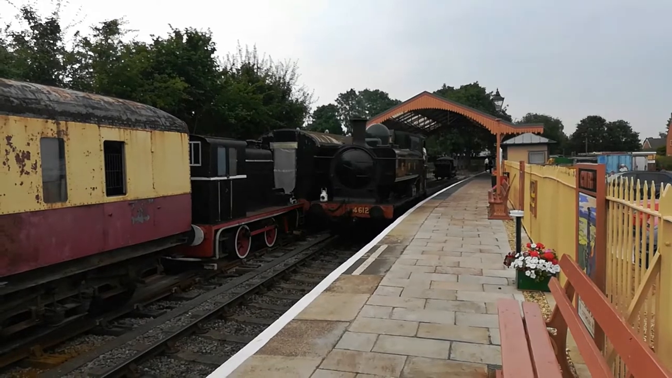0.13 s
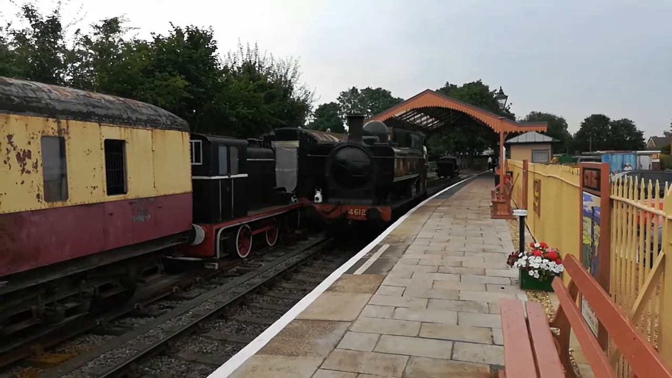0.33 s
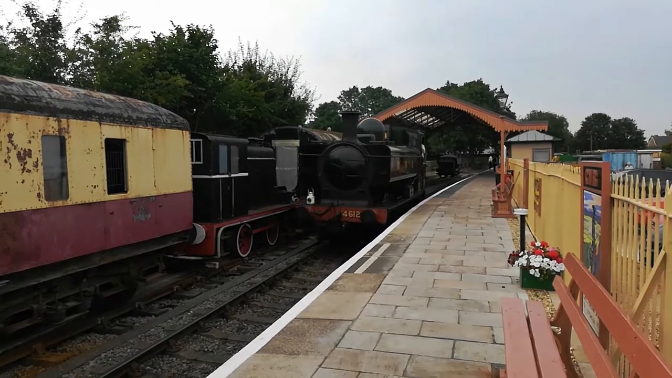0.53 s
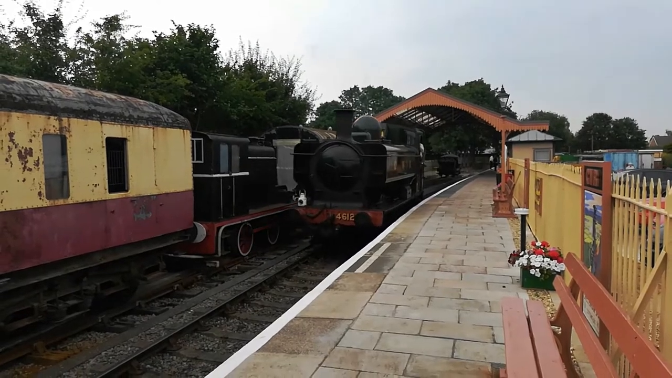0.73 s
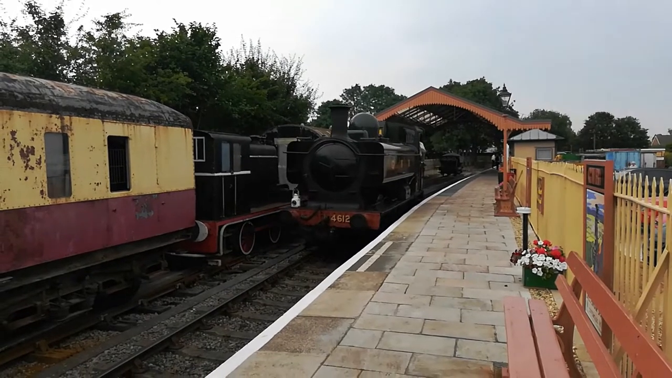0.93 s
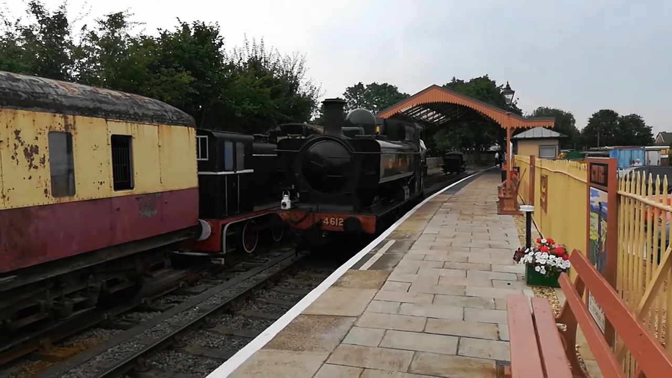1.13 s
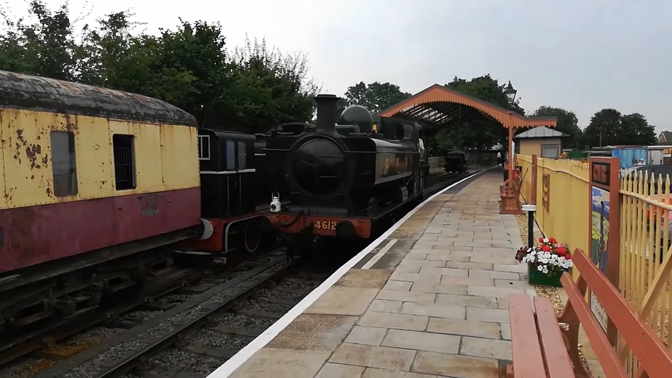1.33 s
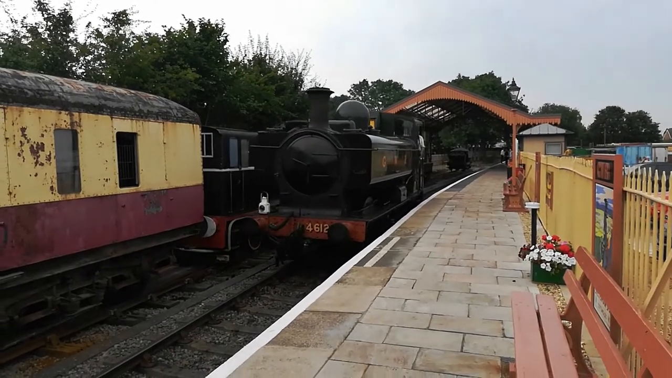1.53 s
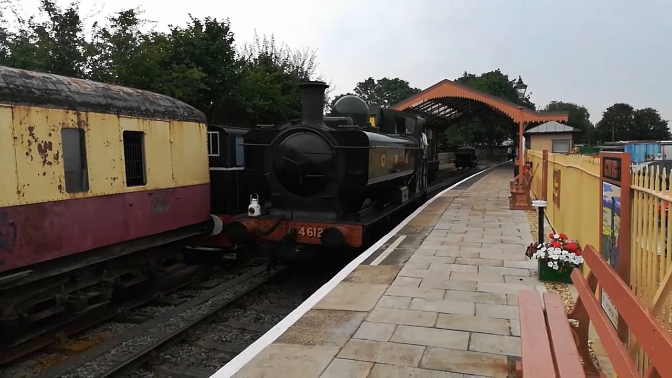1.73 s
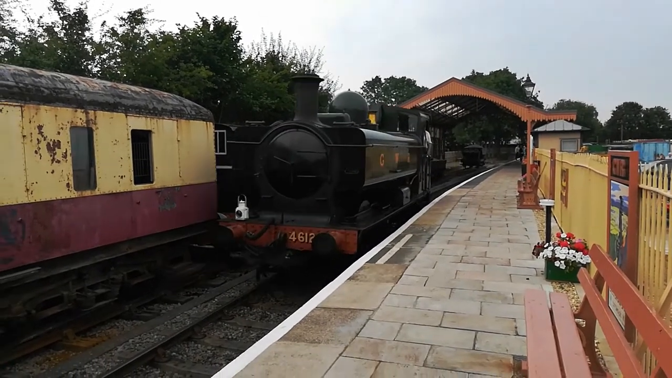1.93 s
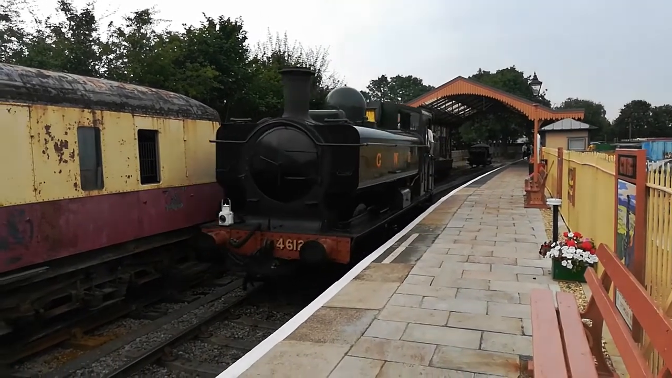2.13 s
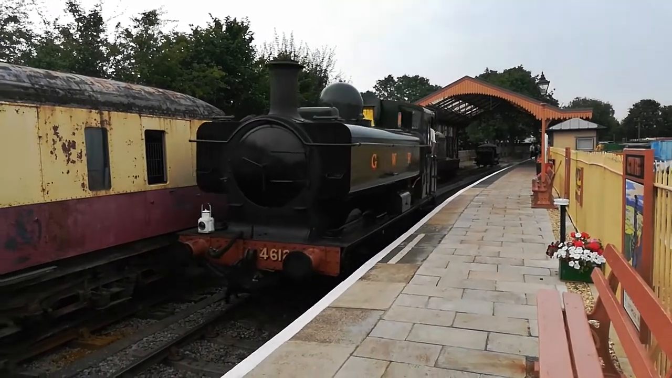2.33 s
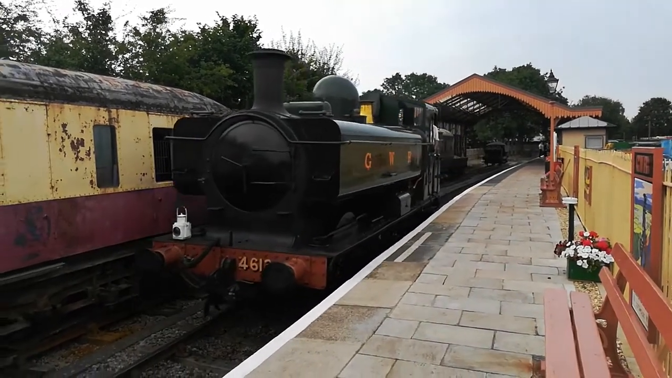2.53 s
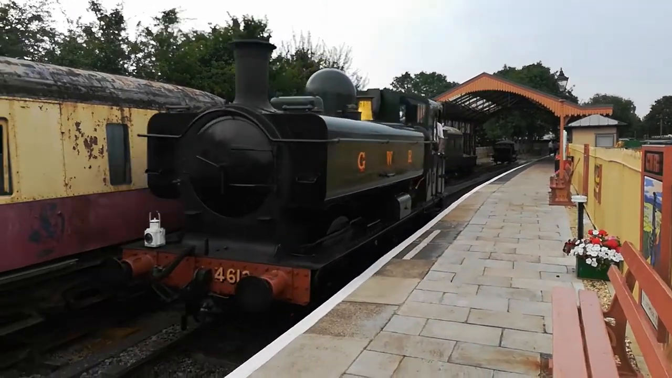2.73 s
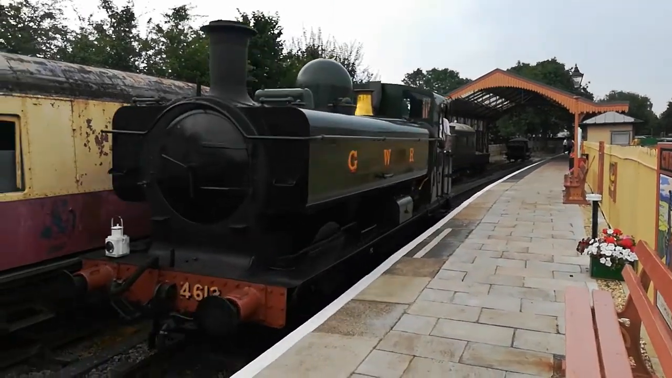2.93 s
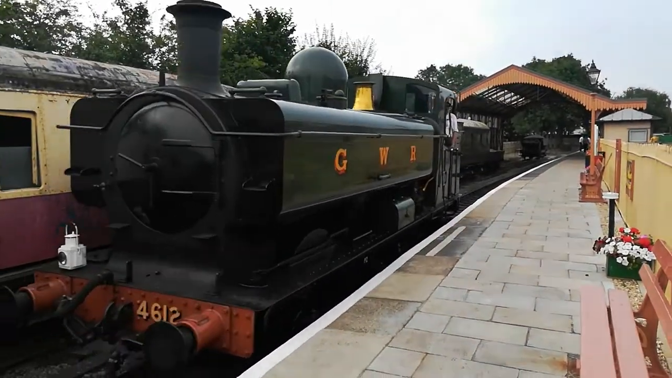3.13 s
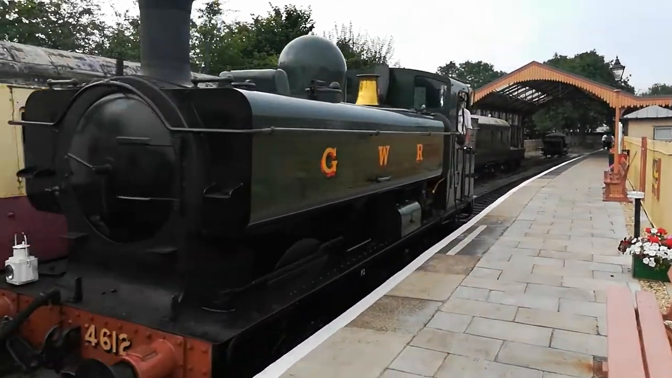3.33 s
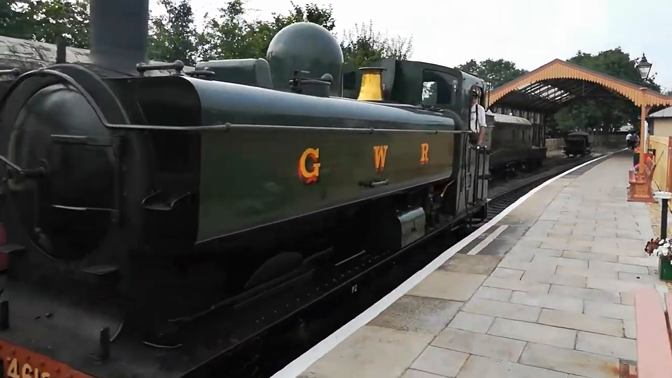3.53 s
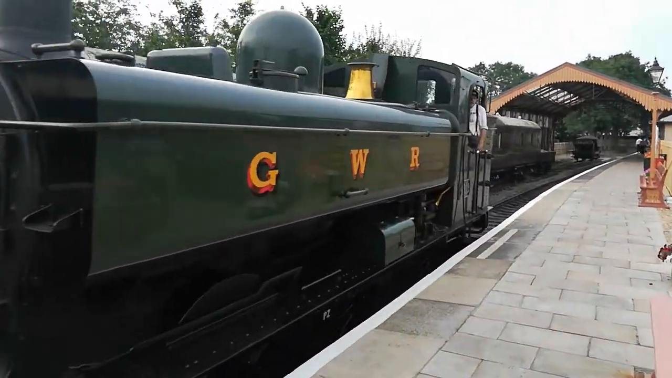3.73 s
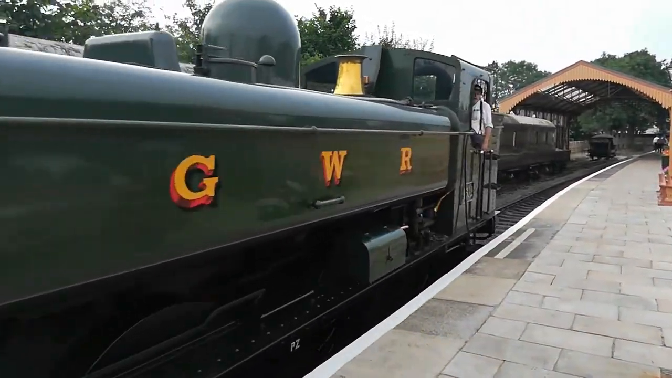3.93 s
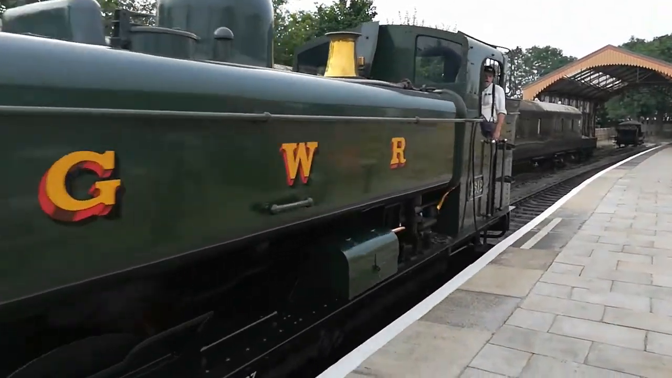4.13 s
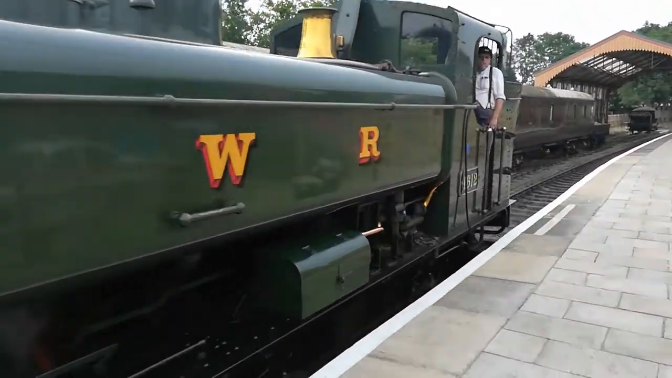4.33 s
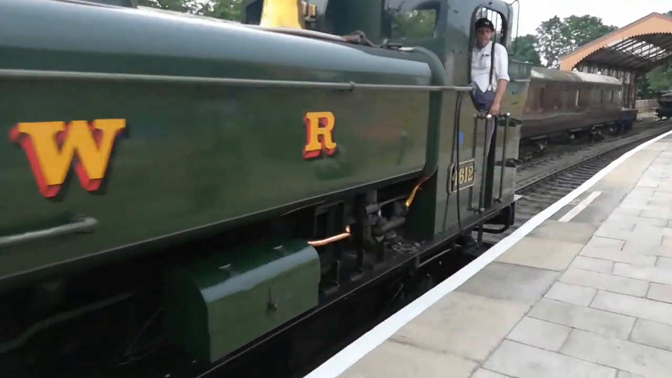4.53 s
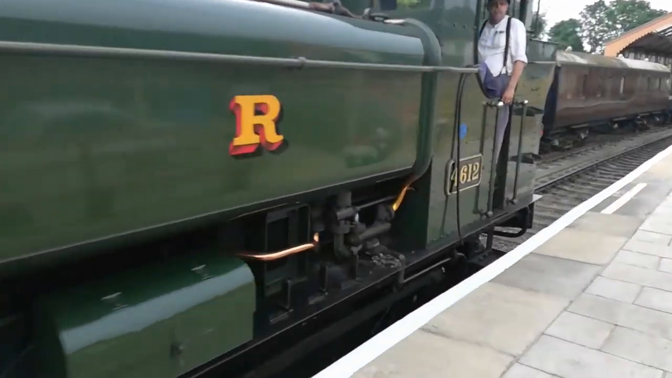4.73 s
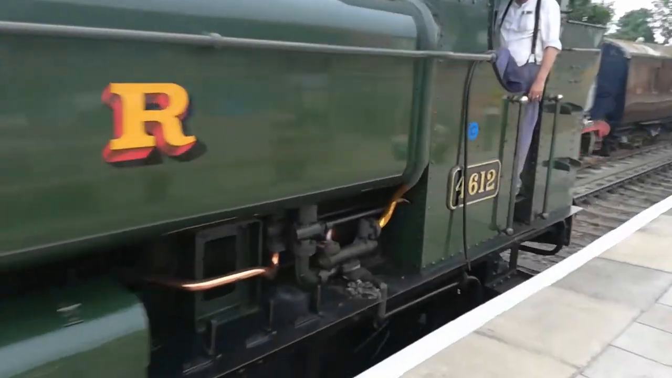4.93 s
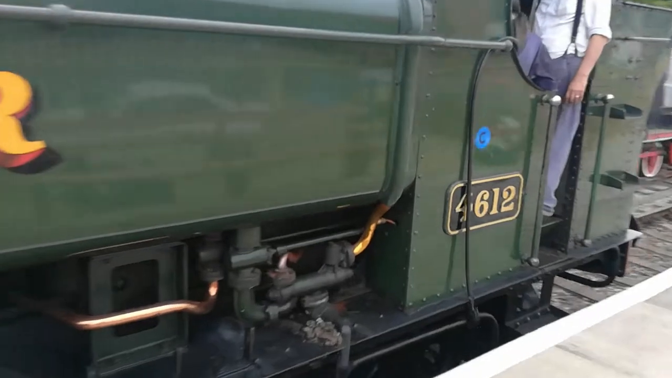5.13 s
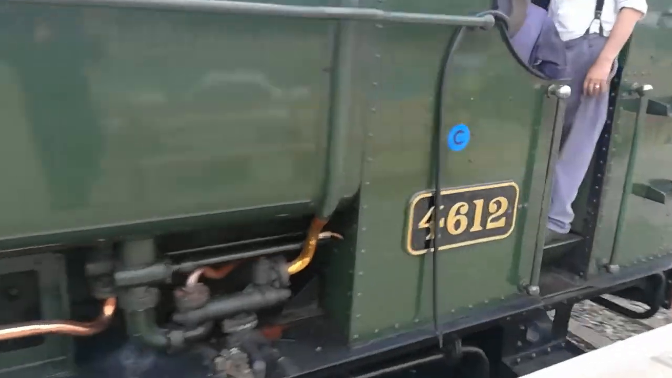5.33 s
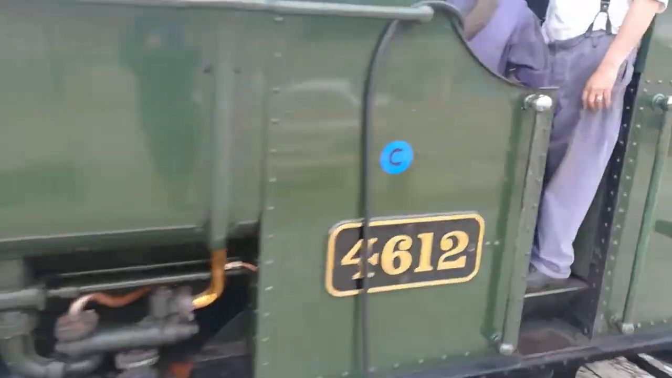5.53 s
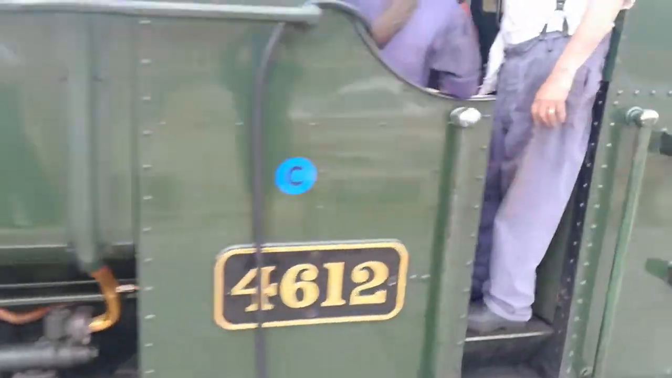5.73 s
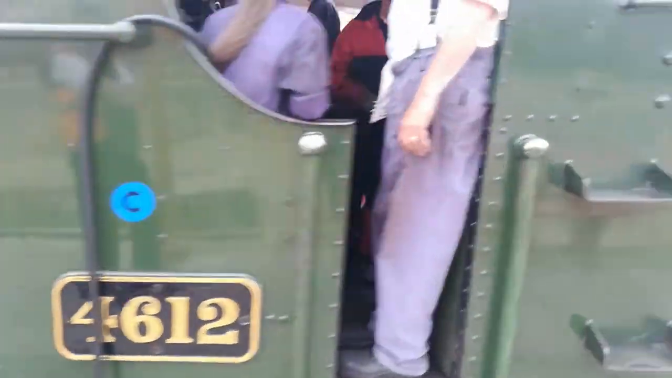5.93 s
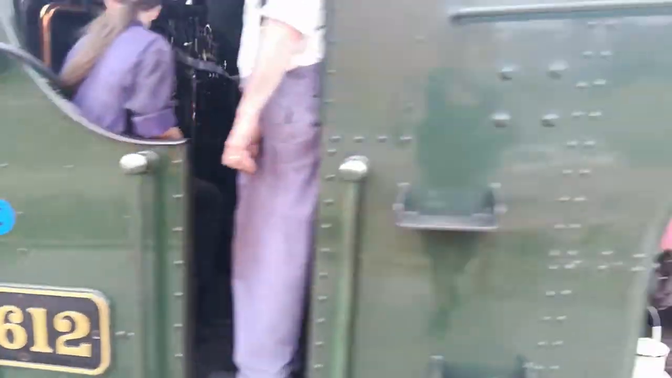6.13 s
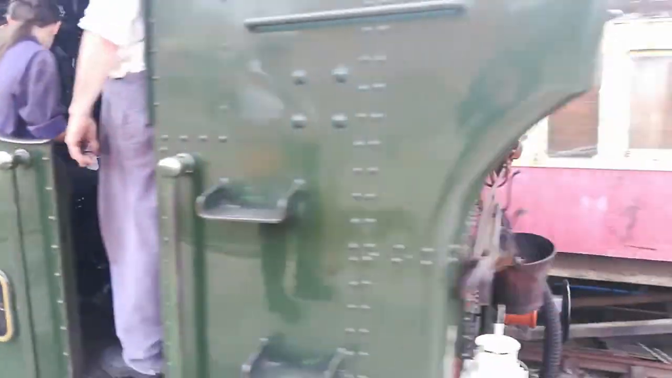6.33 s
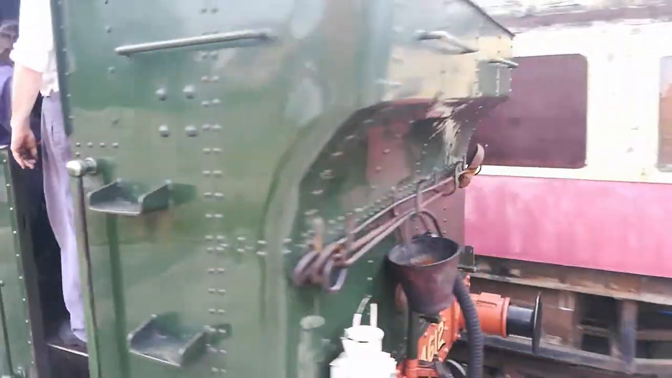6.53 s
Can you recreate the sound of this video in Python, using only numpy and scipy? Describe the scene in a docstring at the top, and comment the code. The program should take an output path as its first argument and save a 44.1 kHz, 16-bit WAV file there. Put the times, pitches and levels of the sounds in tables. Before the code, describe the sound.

Close steam locomotive passing a platform: sharp bursts of wet steam, long then short, over steady thin hiss, dull rumble and knocking ironwork.

```python
"""A thin leak of steam hisses and whistles over the rumble of wheels, and at once the first long puff bursts in.
A steam tank engine is rolling slowly past: long and short puffs alternate, two to a turn of the wheels.
Noise is coloured into steam, with a burst, a driven jet and spitting drops in each puff. Hard strokes add a chuff,
and some rods squeak or screech. Rumble and grinding are filtered noise; thuds and clanks are noise in resonances.
The strokes and the running gear leave a short faint echo around the station."""
import sys
import numpy as np
from scipy import signal
from scipy.fft import rfft, irfft
from scipy.io import wavfile
from scipy.ndimage import uniform_filter1d, map_coordinates

SR = 44100
rng = np.random.default_rng(int(sys.argv[2]) if len(sys.argv) > 2 else 0)


def wav_out(sig):
    """Save sig, one row per channel (or a flat mono array), as 16-bit PCM at SR to the path in sys.argv[1]."""
    wavfile.write(sys.argv[1], SR, np.round(np.clip(np.atleast_2d(sig).T, -1, 1) * 32767).astype(np.int16))


N = 289665
TIME = np.arange(N) / SR
BINS = np.fft.rfftfreq(N, 1 / SR)

# how alike the noise is at the two ears: (frequency [Hz], left-right correlation [-1 to 1])
EAR_LIKENESS = [(30, 1), (70, 0.95), (140, 0.93), (290, 0.78), (420, -0.099), (580, -0.17), (800, -0.37),
                (1100, 0.35), (2000, 0.11), (3500, 0.024)]
# the engine's passage: (time [s], lead of the left ear [ms], leftward shift of the puffs [dB])
PASSAGE = [(0, 0.0067, 1), (2.4, 0.045, 0), (3.6, 0.15, 1), (4.3, 0.35, 0.5), (4.85, 0.41, 3),
           (5.4, 0.48, 5), (6.57, 0.33, 3.5)]

# the steady leak: (time [s], level [dB], lift of its low side [dB])
LEAK = [(0, -39, 2), (0.65, -38.5, 5), (1.15, -35.5, -1), (2.4, -34, 0), (3.15, -35.5, 0.5), (3.65, -32, 3),
        (4.35, -36, 3), (4.85, -33.5, 1), (5.55, -36, 2.5), (6.05, -36.5, 2), (6.57, -39.5, 5.5)]
# its colour: (frequency [Hz], relative level [dB per Hz])
LEAK_COLOUR = [(710, -13.5), (1200, -19), (1310, -15), (1800, -9), (1950, -10.5), (2120, -10.5), (3470, -5),
               (3630, -2), (3950, -5.5), (6410, 2.5), (7370, 0.5), (7940, -0.5), (9530, -10.5),
               (15600, -26.5)]
# its place between the ears: (frequency [Hz], left minus right [dB])
LEAK_SIDE = [(1200, 3.5), (2500, -1), (4500, -6), (6500, -12), (8500, -3), (11000, 2), (15000, 1)]
# its whistles: (pitch [Hz], width [Hz], level before wavering [dB])
LEAK_WHISTLES = [(6350, 70, -48), (7730, 50, -51)]

# rolling wheels, before the trims and the slow rise and fall in wheels():
# (time [s], deep rumble [dB], drumming of the frames [dB], grinding on the rail [dB])
ROLLING = [(0.0, -50, -40.5, -53), (0.58, -45.5, -44, -54), (1.04, -38.5, -41.5, -50),
           (1.28, -44, -40.5, -50.5), (2.08, -43, -48, -56), (2.52, -40.5, -43.5, -51),
           (2.91, -49, -51.5, -63.5), (3.44, -41, -45.5, -56), (3.91, -51, -52.5, -50.5),
           (4.15, -49, -43.5, -54), (4.57, -51, -54, -54), (4.83, -38, -40, -50), (5.1, -50, -51, -55),
           (6.11, -41, -39.5, -53), (6.57, -43.5, -43, -55.5)]
# colour of the rumble and of the grinding: (frequency [Hz], relative level [dB per Hz])
RUMBLE_COLOUR = [(12, -26), (22, -5), (40, 1.5), (60, 5.5), (80, 1), (150, -4), (220, -8), (300, -14),
                 (380, -25), (500, -25), (900, -70)]
GRIND_COLOUR = [(200, -8), (350, -21), (550, 6), (800, -0.5), (1200, 2.5), (1800, -5), (3000, -3),
                (6000, -27)]
# slight rise and fall of the rumble level, timed to the long puffs; its top as a share of
# the time from one long puff to the next
RISE_AND_FALL_DB, RISE_TOP = 0.2, 0.8

# heavy thuds of the running gear:
# (time [s], length, held for half of it [s], boom level [dB], boom pitch [Hz], clank level [dB])
THUDS = [ (0.8, 0.14, -35.5, 112, -43), (0.882, 0.054, -39, 150, -38), (0.941, 0.061, -34.5, 119, -43),
         (1.11, 0.04, -38, 125, -45), (1.255, 0.088, -33, 95, -52), (1.422, 0.1, -39.5, 218, -44),
         (1.555, 0.035, -32.5, 145, -57), (1.9, 0.07, -32.5, 85, -40), (2.521, 0.05, -35.5, 130, -40.5),
         (3.235, 0.053, -40, 140, -45), (3.321, 0.043, -41, 79, -45), (3.51, 0.058, -34.5, 111, -47),
         (3.742, 0.042, -31.5, 162, -58), (4.802, 0.11, -30.5, 270, -62), (4.81, 0.28, -34, 105, -58),
         (5.352, 0.15, -33, 202, -43.5), (5.421, 0.075, -30, 85, -59), (5.508, 0.059, -26, 73, -42.5),
         (6.102, 0.1, -26, 61, -43.5), (6.325, 0.024, -37.5, 199, -50), (6.44, 0.025, -28.5, 136, -60)]
# resonances of the ironwork: (pitch [Hz], width [Hz], relative level [dB])
IRON = [(397, 280, 0), (517, 120, 4.5), (653, 52, -3.5), (884, 130, 6), (1280, 190, 0), (1670, 90, 3.5),
        (2090, 70, 1.5)]
# light knocks: rate, length and middle boom pitch; boom level is re the ROLLING drumming, clank likewise
KNOCKS_PER_S, KNOCK_S, KNOCK_HZ = 3, 0.039, 118
KNOCK_DB, KNOCK_CLANK_DB = 2.5, -6.5

# screeches of a dry rod sliding in its gland: (time [s], length [s], level [dB], centre pitch [Hz])
SCREECHES = [(0.805, 0.044, -26, 7600), (0.845, 0.055, -28.5, 8230), (2.034, 0.037, -26, 5700),
             (2.091, 0.11, -30.5, 5920), (2.229, 0.039, -30.5, 5600)]
# clear squeaks and whistles in the strokes: (time [s], length [s], pitch [Hz], width [Hz], level [dB])
SQUEAKS = [ (0.735, 0.057, 7300, 50, -28), (0.847, 0.058, 7440, 120, -31), (0.849, 0.047, 4840, 35, -32),
           (2.031, 0.049, 5400, 50, -26), (2.087, 0.099, 4930, 40, -28.5), (2.09, 0.095, 2850, 110, -39.5),
           (2.091, 0.11, 6920, 80, -28.5), (2.134, 0.084, 1754, 60, -45), (2.232, 0.045, 7180, 35, -26.5),
           (3.162, 0.03, 3950, 196, -27.5), (3.318, 0.14, 3790, 161, -34.5), (4.384, 0.018, 4015, 397, -22),
           (4.522, 0.11, 6090, 129, -29)]
# low chuff of a hard stroke: (time [s], level before the decay [dB], pitch [Hz], decay time constant [s])
CHUFFS = [(2.54, -39, 1080, 0.12), (3.776, -33, 1400, 0.16), (4.388, -49.5, 1260, 0.23),
          (4.984, -39, 2550, 0.069), (5.6, -31, 2350, 0.14), (6.201, -40.5, 1980, 0.11)]

# long stroke, once in each turn of the wheels, before the trim in cylinders():
# (time [s], length [s], time to the top of the burst [s], burst level [dB], jet level [dB],
#  hollow low part re level [dB], fizz re level [dB])
LONG_PUFFS = [ (0.073, 0.58, 0.038, -25.5, -22, -4.5, -11.5), (1.303, 0.59, 0.045, -24.5, -21, -4, -10.5),
              (2.539, 0.61, 0.047, -20.5, -19.5, -4.5, -11.5), (3.769, 0.6, 0.027, -16.8, -21, -5, -11),
              (4.983, 0.56, 0.0065, -14.5, -24.5, -2.5, -12.5), (6.193, 0.59, 0.043, -19.5, -30.5, -5, -13)]
# short stroke, also before the trim: (time [s], length [s], time to the top of the burst [s],
#  burst level [dB], jet level [dB], hollow low part re level [dB], fizz re level [dB])
SHORT_PUFFS = [ (0.694, 0.24, 0.006, -26.5, -29.5, -5, -11), (1.929, 0.27, 0.0067, -24, -32.5, -5.5, -12.5),
               (3.163, 0.32, 0.022, -21, -33, -2, -12.5), (4.385, 0.32, 0.0031, -16, -26, -5.5, -12.5),
               (5.595, 0.3, 0.019, -19.5, -33.5, -3, -9.5)]
# colour of each stroke: (frequency [Hz], relative level [dB per Hz])
LONG_COLOUR = [(350, -63), (700, -30), (1200, -21.5), (1700, -20), (2200, -15), (2650, -12), (3600, -6),
               (4800, -0.5), (6260, 1), (7900, -5), (9500, -12.5), (11500, -21), (14000, -24), (15600, -35)]
SHORT_COLOUR = [(350, -64), (700, -22), (1300, -16), (1700, -23.5), (2200, -12.5), (2600, -9), (3480, -1),
                (4330, 2.5), (5930, 4), (7900, -8), (9500, -12), (11500, -23.5), (14400, -28), (15600, -38)]
# place of each stroke between the ears: (frequency [Hz], left minus right [dB])
LONG_SIDE = [(700, 4.5), (1300, -0.5), (2000, 2), (2800, -5), (4200, -6), (6400, -13), (8000, -9),
             (9800, 0.5), (15000, -0.5)]
SHORT_SIDE = [(700, 5), (2000, 3), (3200, -5.5), (4500, -8), (6500, -13.5), (8500, -6), (11000, 1.5),
              (15000, -2)]
# hollows between the frames colour every puff: (frequency [Hz], half width [Hz], lift or cut [dB])
HOLLOWS = [(1170, 86, -6), (1680, 29, 5.5), (2123, 58, 6), (3580, 35, 2), (3640, 23, -3), (5930, 130, 0.5)]
# the burst starts this far under its top, then dies away as the trapped steam is spent
OPENING_DB, SPENT_DB_PER_S = 4, 67

EDGE_HZ = 15750  # upper limit of the whole sound


def amp(db):
    """Turns decibels into an amplitude factor."""
    return 10 ** (np.asarray(db) / 20)


def evened(x):
    """Scales a sound, or the middle of a stereo pair, to rms 1."""
    middle = np.atleast_2d(x).mean(0)
    return x / np.sqrt(np.mean(middle ** 2) + 1e-20)


def read(points, hz):
    """Reads a table along a log-frequency axis."""
    f, value = np.transpose(points)[:2]
    return np.interp(np.log(hz + 1), np.log(f + 1), value)


def follow(rows, t=TIME):
    """Reads every column of a curve at the times t."""
    s, *columns = np.transpose(rows)
    return [np.interp(t, s, column) for column in columns]


def add(mix, s, sound):
    """Lays a stereo sound into the mix at s seconds, cut off at the end of the mix."""
    part = mix[:, max(round(s * SR), 0):][:, :sound.shape[1]]
    part += sound[:, :part.shape[1]]


def shaped(x, gain):
    """Filters by a gain on an even frequency grid from 0 to SR / 2."""
    return irfft(rfft(x) * gain, x.shape[-1])


def lowpass(f, hz):
    """Steep low-pass gain; one minus it is the matching high-pass."""
    return 1 / (1 + (f / hz) ** 8)


def wander(n, hz):
    """Slow random motion, scaled to rms 1 over the whole scene and cut to n samples."""
    motion = shaped(rng.standard_normal(N), 1 / (1 + (BINS / hz) ** 2))
    return evened(motion)[:n]


def sides(db):
    """Left and right gains for a level difference."""
    return amp(np.array([db, -db]) / 2)


def pair(n):
    """Noise at two ears, alike in the bass and almost unrelated in the treble."""
    same = np.clip(read(EAR_LIKENESS, np.fft.rfftfreq(n, 1 / SR)), -1, 1)
    a, b = rng.standard_normal((2, n))
    right = shaped(a, same) + shaped(b, np.sqrt(1 - same ** 2))
    return np.array([a, right])


def ringing(n, modes):
    """Noise in a set of resonances, each (pitch [Hz], width [Hz], level [dB])."""
    f = np.fft.rfftfreq(n, 1 / SR)
    gain = sum(amp(db) / np.sqrt(width) / (1 + ((f - hz) / width) ** 2) for hz, width, db in modes)
    return evened(shaped(pair(n), gain))


def eddies(x, patchy_db, size):
    """Turbulence lifts and sinks patches of the spectrum; size is (bins, frames)."""
    z = signal.stft(x, nperseg=512, noverlap=384)[2]
    patches = uniform_filter1d(rng.standard_normal(z.shape), size[0], 1)
    patches = uniform_filter1d(patches, size[1], 2)
    stirred = z * amp(patchy_db * patches / patches.std())
    return signal.istft(stirred, nperseg=512, noverlap=384)[1][:, :x.shape[1]]


def station(x, t60=0.48, delay=0.011):
    """Carriages, fence and canopy scatter a short echo: sparse random taps that die away."""
    t = np.arange(SR // 2) / SR
    scattered = rng.random((2, len(t))) < 2000 / SR  # about 2000 reflections a second
    taps = rng.standard_normal((2, len(t))) * scattered * (t > delay) * amp(-60 * t / t60)
    taps = taps / np.linalg.norm(taps, axis=1, keepdims=True)
    return signal.fftconvolve(x, taps, axes=1)[:, :N]


def leak(direct=0.33, whistle_waver_db=3.0, low_hz=4800):
    """A steady thin jet in plain view: its direct share reaches the left ear early, as PASSAGE sets."""
    lead_ms = follow(PASSAGE)[0]
    level_db, full_db = follow(LEAK)
    jet = rng.standard_normal(N)
    early = map_coordinates(jet, [np.arange(N) + lead_ms * SR / 1000], mode="wrap")
    share = np.clip(direct, 0, 1)  # the rest is unrelated at the two ears
    air = np.sqrt(share) * np.array([early, jet]) + np.sqrt(1 - share) * rng.standard_normal((2, N))
    place = sides(read(LEAK_SIDE, BINS))
    turbulent = eddies(air, patchy_db=2.5, size=(3, 40))
    hiss = evened(shaped(turbulent, amp(read(LEAK_COLOUR, BINS)) * place))
    hiss = hiss + (amp(full_db) - 1) * shaped(hiss, lowpass(BINS, low_hz))
    whistles = np.zeros((2, N))
    for hz, width, db in LEAK_WHISTLES:
        tone = evened(shaped(ringing(N, [(hz, width, 0)]), place))
        whistles += amp(db + whistle_waver_db * wander(N, hz=1.3)) * tone
    return hiss * amp(level_db) + whistles


def slow_rise_and_fall():
    """Slight slow rise and fall of the rumble level, timed to the long puffs and lower while they are loud."""
    starts = [row[0] for row in LONG_PUFFS]
    cycles = (TIME - starts[0]) / np.mean(np.diff(starts))
    return amp(RISE_AND_FALL_DB * np.cos(2 * np.pi * (cycles - RISE_TOP)))


def wheels(deep_db=2.5, body_db=1.0, grind_db=1.2, lumpy_db=2, gritty_db=2, split_hz=110):
    """Heavy wheels shake the track and the frames, and grind along the rail."""
    deep_level, body_level, grind_level = follow(ROLLING)
    lumpy = pair(N) * amp(lumpy_db * wander(N, hz=8.0))
    shake = shaped(lumpy, amp(read(RUMBLE_COLOUR, BINS)))
    deep = shaped(shake, lowpass(BINS, split_hz))
    rumble = evened(deep) * amp(deep_level + deep_db)
    drumming = evened(shake - deep) * amp(body_level + body_db)
    grit = eddies(pair(N), patchy_db=7.0, size=(2, 30)) * amp(gritty_db * wander(N, hz=50))
    # the grinding leans left, and follows half the shift of the puffs
    place = sides(1.6 + follow(PASSAGE)[1] / 2)
    grind = evened(shaped(grit, amp(read(GRIND_COLOUR, BINS))) * place)
    return (rumble + drumming + grind * amp(grind_level + grind_db)) * slow_rise_and_fall()


def knocks(spread_db=3, octaves=0.71):
    """Light knocks of loose parts, each at its own moment and pitch, harder when the frames drum."""
    rows = []
    chances = rng.uniform(-1, 1, (round(KNOCKS_PER_S * N / SR), 3))
    for k, (when, force, pitch) in enumerate(chances):
        s = (k + (1 + when) / 2) / KNOCKS_PER_S  # one in each equal slot of time
        db = follow(ROLLING, s)[1] + spread_db * force
        hz = KNOCK_HZ * 2 ** (octaves * pitch)
        rows.append((s, KNOCK_S, db + KNOCK_DB, hz, db + KNOCK_CLANK_DB))
    return rows


def gear(rise=0.0034, tail=0.017, iron_tail=0.026, boom_width=0.4, dull_hz=350):
    """Slack rods and axle boxes take up the load: a dull shuddering boom with a clank of iron."""
    out = np.zeros((2, N))
    t = np.arange(SR // 2) / SR
    dull = lowpass(np.fft.rfftfreq(len(t), 1 / SR), dull_hz)
    for s, length, db, hz, clank_db in list(THUDS) + knocks():
        after = np.maximum(t - length / 2, 0)
        boom = evened(shaped(ringing(len(t), [(hz, boom_width * hz, 0)]), dull))
        boom = boom * np.exp(-after / tail)
        clank = ringing(len(t), IRON) * np.exp(-after / iron_tail)
        add(out, s, np.minimum(t / rise, 1) * (amp(db) * boom + amp(clank_db) * clank))
    return out


def screeches(count=7, octaves_below=1.0, octaves_above=0.403, width_hz=70, rasp_db=4, rasp_hz=2200,
              rise=0.003, fall_db=7, tail=0.012, side_db=-8):
    """The rod catches at once: a cluster of thin, chance pitches over a wide rasp, fading as it slides on."""
    out = np.zeros((2, N))
    t = np.arange(SR // 4) / SR
    for s, length, db, centre in SCREECHES:
        spread = (np.arange(count) + rng.random(count)) / count
        pitches = centre * 2 ** ((octaves_below + octaves_above) * spread - octaves_below)
        thin = [(hz, width_hz, 0) for hz in pitches]
        cry = ringing(len(t), thin + [(centre, rasp_hz, rasp_db)])
        fading = amp(-fall_db * t / length) * np.exp(-np.maximum(t - length, 0) / tail)
        slide = np.minimum(t / rise, 1) * fading
        add(out, s, amp(db) * slide * evened(cry * sides(np.full(len(t), side_db))))
    return out


def squeaks(side_db=-9, fade=0.24, sag=0.0196, rough_db=3.0, fall_db=4):
    """Brief whistles where steam squeezes past the sliding rods; each is unsteady and sags in pitch."""
    out = np.zeros((2, N))
    for s, length, hz, width, db in SQUEAKS:
        n = round(length * SR)
        turns = np.cumsum(hz * (1 + sag * np.linspace(.5, -.5, n))) / SR
        # a random walk of the phase gives the line its width
        drift = np.cumsum(rng.standard_normal((2, n)), 1) * np.sqrt(2 * np.pi * width / SR)
        unsteady = amp(rough_db * wander(n, hz=150) - fall_db * np.linspace(0, 1, n))
        tone = np.sin(2 * np.pi * turns + drift) * unsteady
        ends = signal.windows.tukey(n, np.clip(fade, 0, 1))
        add(out, s, amp(db) * evened(tone * sides(np.full(n, side_db))) * ends)
    return out


def chuffs(rise=0.0046, octaves=0.63, side_db=3):
    """The first rush of a hard stroke sounds the hollow under the boiler."""
    out = np.zeros((2, N))
    t, f = np.arange(SR) / SR, np.fft.rfftfreq(SR, 1 / SR)
    for s, db, hz, decay in CHUFFS:
        hollow = np.exp(-(np.log2((f + 1) / hz) / octaves) ** 2)
        turbulent = eddies(pair(SR), patchy_db=3.5, size=(2, 60))
        rush = shaped(turbulent, hollow * sides(np.full(len(f), side_db)))
        add(out, s, amp(db) * evened(rush) * np.minimum(t / rise, 1) * np.exp(-t / decay))
    return out


def stroke(t, length, top_s, burst_db, jet_db, skew, fullness):
    """A burst of trapped steam dies away while the piston drives a jet that swells and shuts.
    Gives the level, and how far the jet has taken over (0-1)."""
    opening = OPENING_DB * np.maximum(1 - t / top_s, 0)
    spent = SPENT_DB_PER_S * np.maximum(t - top_s, 0)
    burst = amp(burst_db - opening - spent)
    flow = abs(np.sin(np.pi * (t / length) ** skew)) ** fullness
    level = np.hypot(burst, amp(jet_db) * flow)
    return level, flow * (1 - (burst / level) ** 2)


def puff(row, colour, side, rise, skew, fullness, thin_db, dull_db, close=0.041,
         spits_per_s=1500, spit_db=6, flutter_db=0.5, low_hz=4300, high_hz=8500):
    """A valve opens at once on a jet of steam that carries spitting drops of water."""
    start, length, top_s, burst_db, jet_db, hollow_db, fizz_db = row
    t = np.arange(0, length, 1 / SR)
    n, f = len(t), np.fft.rfftfreq(len(t), 1 / SR)
    level, driven = stroke(t, length, top_s, burst_db, jet_db, skew, fullness)
    spits = amp(spit_db) * rng.standard_normal((2, n)) * (rng.random((2, n)) < spits_per_s / SR)
    jet = eddies(pair(n) + spits, patchy_db=3.0, size=(2, 50))
    lift_db = sum(db / (1 + ((f - hz) / width) ** 2) for hz, width, db in HOLLOWS)
    jet = shaped(jet, amp(read(colour, f) + lift_db) * sides(read(side, f)))
    # thin_db and dull_db change the low part and the fizz as the driven jet takes over
    low, high = lowpass(f, low_hz), 1 - lowpass(f, high_hz)
    body = evened(shaped(jet, 1 - low - high))
    hollow = amp(hollow_db + thin_db * driven) * evened(shaped(jet, low))
    fizz = amp(fizz_db + dull_db * driven) * evened(shaped(jet, high))
    valve = np.clip(t / rise, 0, 1) * np.clip((length - t) / close, 0, 1)
    shift = sides(follow(PASSAGE, start + t)[1])
    flutter = amp(flutter_db * wander(n, hz=60))
    return start, (body + hollow + fizz) * level * valve * shift * flutter


def cylinders(long_db=-2.5, short_db=-2.5):
    """Wet steam escapes at every piston stroke: long and short puffs in turn, two to a turn of the wheels."""
    out = np.zeros((2, N))
    for row in LONG_PUFFS:
        s, steam = puff(row, LONG_COLOUR, LONG_SIDE, rise=0.0012, skew=1.22, fullness=0.86,
                        thin_db=-7.0, dull_db=-0.2)
        add(out, s, amp(long_db) * steam)
    for row in SHORT_PUFFS:
        s, steam = puff(row, SHORT_COLOUR, SHORT_SIDE, rise=0.0022, skew=1.73, fullness=0.7,
                        thin_db=1.1, dull_db=-13)
        add(out, s, amp(short_db) * steam)
    return out


def scene(echo_db=-15):
    """Strokes and running gear with their echo, over the leak and the wheels, which have none."""
    strokes = cylinders() + chuffs() + squeaks() + screeches() + gear()
    return strokes + amp(echo_db) * station(strokes) + leak() + wheels()


def record(dry):
    """Rounds off the highest peaks, then cuts the treble above the band limit."""
    rounded = dry / (1 + (dry / .88) ** 6) ** (1 / 6)
    band = signal.firwin(511, EDGE_HZ, window=("kaiser", 9), fs=SR)
    return signal.oaconvolve(rounded, band[None], "same")


dry = scene()
out = record(dry)
wav_out(out)
```